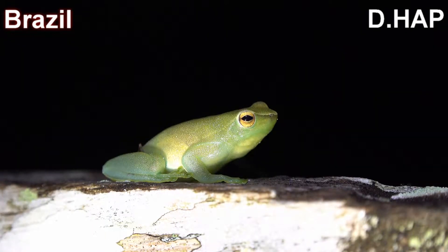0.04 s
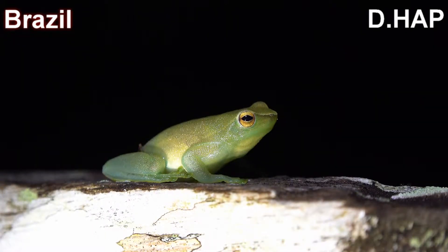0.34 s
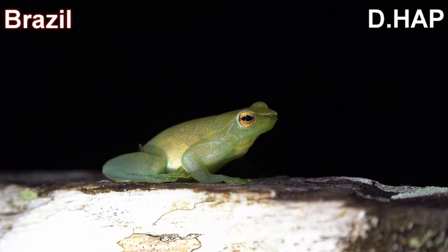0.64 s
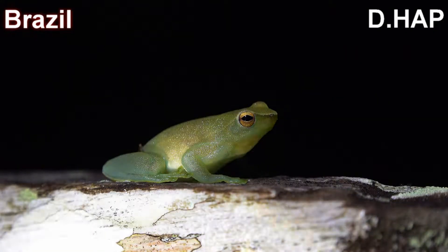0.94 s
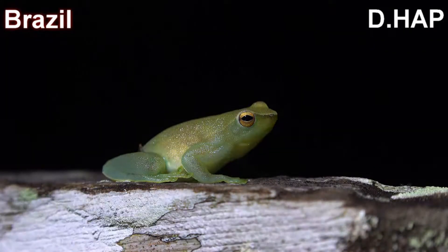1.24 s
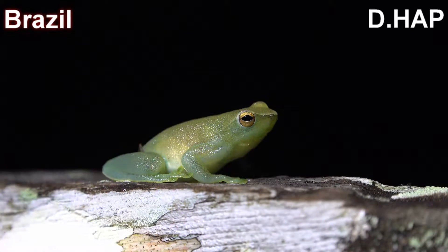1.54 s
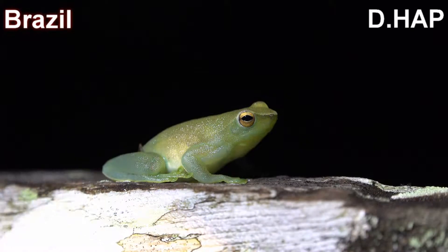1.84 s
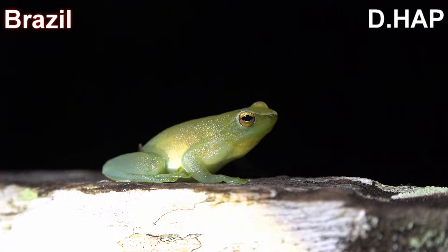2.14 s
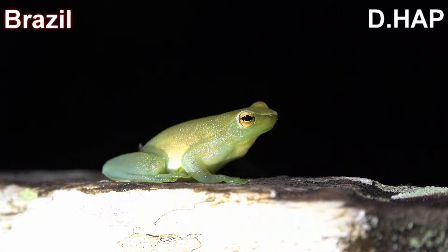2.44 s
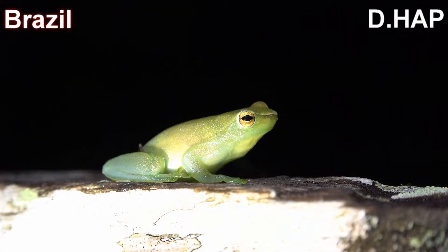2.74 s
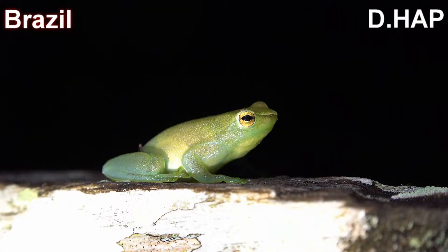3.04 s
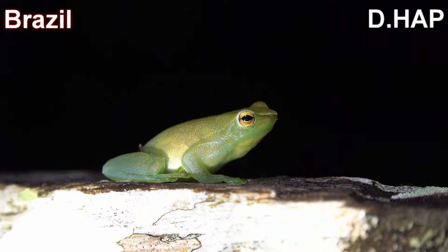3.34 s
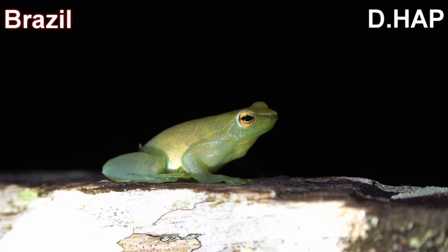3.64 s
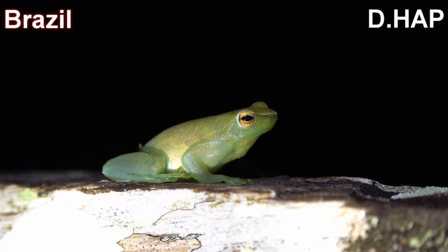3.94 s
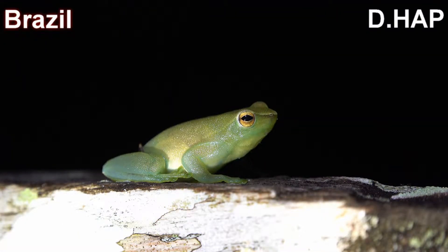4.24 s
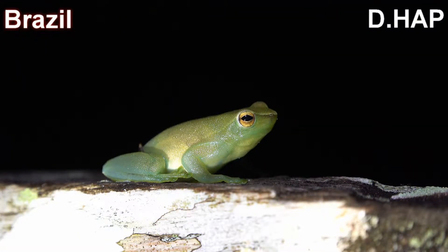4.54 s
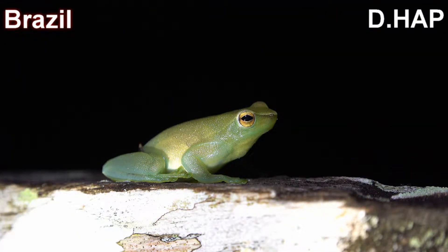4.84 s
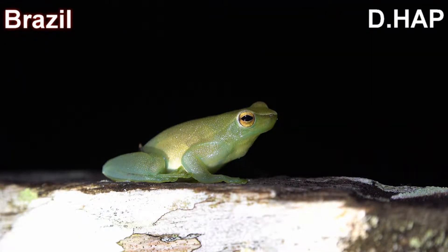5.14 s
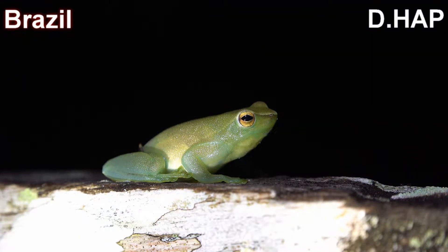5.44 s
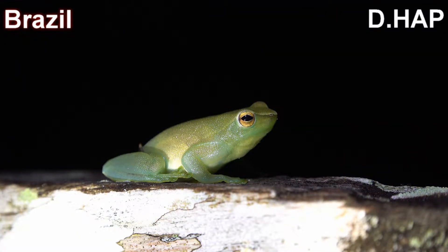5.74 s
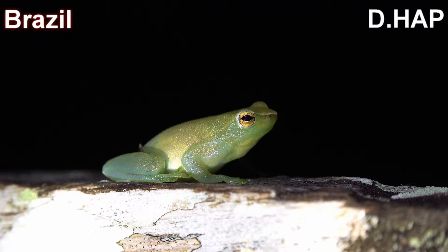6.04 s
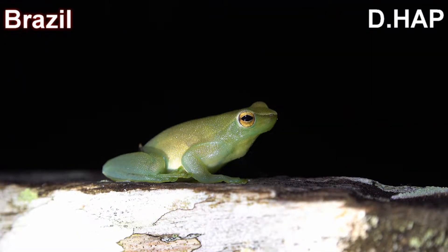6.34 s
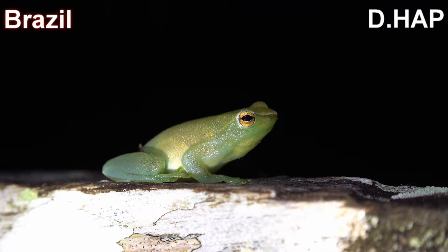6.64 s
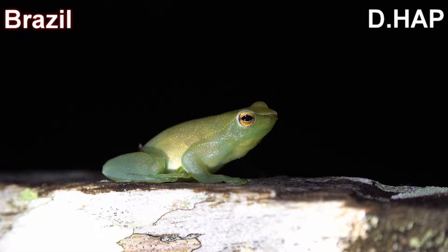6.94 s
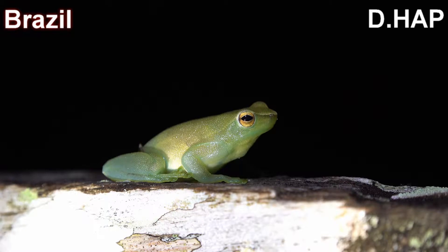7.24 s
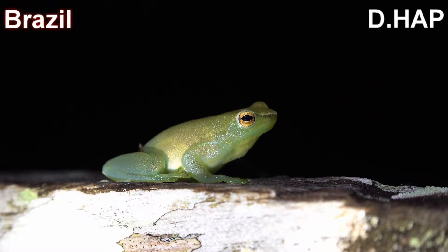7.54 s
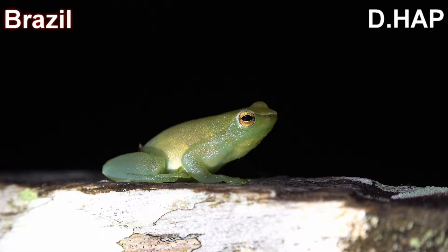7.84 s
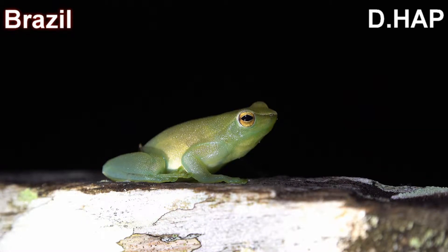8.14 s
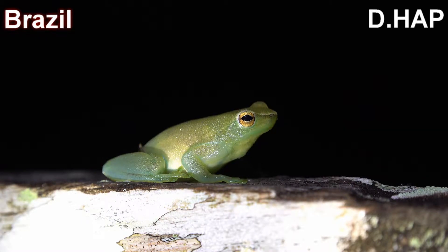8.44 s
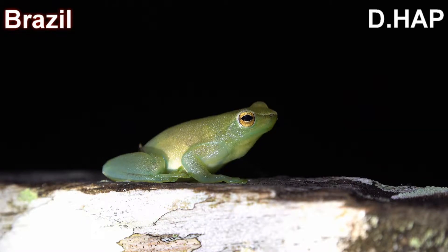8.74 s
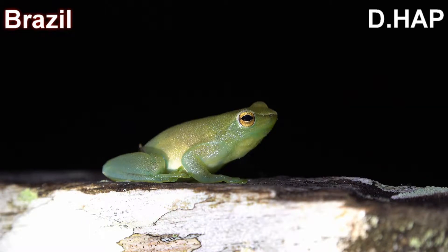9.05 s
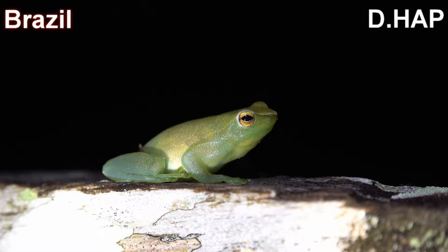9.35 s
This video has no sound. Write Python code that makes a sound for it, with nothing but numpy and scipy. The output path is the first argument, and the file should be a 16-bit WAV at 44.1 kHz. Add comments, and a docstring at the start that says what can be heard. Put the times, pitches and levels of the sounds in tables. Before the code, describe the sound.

A steady bed of crickets and bursts of high katydid rasping surround the microphone in a night forest. Just right of centre, a close tree frog repeats a quick upward whistle roughly every second. Other frogs answer with soft squeaks and distant whistles through the first half, and a high trill stops after two seconds. A far, lower trill comes and goes throughout, with a faint low hum underneath.

```python
"""A forest at night, in stereo, over a bed of crickets and a faint low hum. From the start katydids
rasp their wings in bouts, a far frog pulses a low trill and a high trill runs for two seconds.
From 0.7 s a tree frog, close and a little right of the microphone, sweeps a rising whistle through its
vocal sac about once a second, and trunks throw it back. Softer squeaks and farther whistles answer
until just past five seconds; then a faint far tone swells under the near frog and the insects."""
import sys
import numpy as np
from scipy import signal
from scipy.fft import rfft, irfft
from scipy.io import wavfile
from scipy.ndimage import uniform_filter1d

SR = 44100
rng = np.random.default_rng(int(sys.argv[2]) if len(sys.argv) > 2 else 0)


def wav_record(signal):
    """Record a signal, one row per channel, as 16-bit PCM in the file named by sys.argv[1]."""
    frames = np.transpose(np.atleast_2d(signal))
    bounded = np.clip(frames, -1, 1)
    # unit amplitude maps onto the largest positive 16-bit level
    quanta = np.round(bounded * 32767).astype(np.int16)
    wavfile.write(sys.argv[1], SR, quanta)


N = 414540
TIME = np.arange(N) / SR
FREQ = np.fft.rfftfreq(N, 1 / SR) + 1e-6


def near_frog(base_db=-38, fade_db=-22.5, attack_s=.024, release_s=.012, flutter_hz=145, flutter=.59):
    """Close, right: one sweep rings the vocal sac at each call; it flutters low down and ends smooth."""
    # the calls (time [s], relative level [dB], push on the high ending [dB])
    calls = [(.6704, 0, 5), (1.7132, .3, 4), (2.669, 0, 2), (3.7956, -.5, 9), (4.6527, 0, 7),
             (6.3747, -.4, 10), (7.2767, .5, 2.5), (8.2359, 0, 9.5), (9.3049, -.4, 8.5)]
    # the sweep they share (time from the call's loudest moment [s], pitch [Hz])
    sweep = [(-.06, 942), (-.05, 993), (-.04, 1424), (-.008, 1803), (.008, 2159), (0.024, 2515),
             (0.043, 2650), (.076, 3016), (.105, 2870)]
    # vocal sac resonances (centre [Hz], half width [Hz], boost [dB])
    sac = [(1932, 180, 19.5), (2528, 36, 7)]
    # echoes from near trunks (delay [s], pressure [share of the direct sound])
    trunks = [(.00967, 0.093), (0.0117, 0.46), (0.0231, .12), (.03914, 0.094)]
    knots, pitch = np.transpose(sweep)
    s = np.linspace(knots[0], knots[-1], 200)
    hz = np.interp(s, knots, pitch)
    fade = np.clip(1 - (s - s[0]) / attack_s, 0, 1) + np.clip(1 - (s[-1] - s) / release_s, 0, 1)
    sac_db = sum(boost / (1 + ((hz - centre) / width) ** 2) for centre, width, boost in sac)
    db = base_db + fade_db * fade + sac_db
    ending = np.exp(-((s - .08) / .017) ** 2)
    voice = 0
    for at, call_db, push_db in calls:
        depth = np.interp(TIME - at, [0, .012], [flutter, 0])
        tone = glide(at + s, hz * (1 + .0027 * rng.standard_normal()), db + call_db + push_db * ending)
        voice = voice + tone * (1 + depth * np.cos(2 * np.pi * flutter_hz * (TIME - at)))
    voice = voice + sum(share * delayed(voice, delay) for delay, share in trunks)
    voice = voice * undb(walk(120))  # the call swells in small lumps
    # leaves scatter the short waves of the ending more than the low start
    scatter = forest(voice, wet_db=-11, t60=.39, side=.45) - voice
    scatter = irfft(rfft(scatter) * colour([(1200, -2), (2000, -3.5), (2800, 4.5)]), N)
    return pan(voice + scatter, left_db=-3)


def squeak(start, length, top_hz, rise_db, fall_db, foot_hz=1000, attack_s=.018, release_s=.0079):
    """Tension builds slowly and lets go quickly; the pitch follows, and the tone thins as it climbs."""
    u = np.linspace(0, 1, 100)
    crest = .68  # share of the length
    rising = np.minimum(u / crest, 1)
    falling = np.clip((u - crest) / (1 - crest), 0, 1)
    tension = np.sin(np.pi / 2 * rising) ** 2.6 * np.cos(np.pi / 2 * falling) ** 1.26
    hz = foot_hz * (top_hz / foot_hz) ** tension
    edges = np.clip(1 - u * length / attack_s, 0, 1) + np.clip(1 - (1 - u) * length / release_s, 0, 1)
    effort_db = rise_db + (fall_db - rise_db) * np.minimum(2 * falling, 1)
    thinning_db = -23 * np.maximum(np.log2(hz / 1300), 0)  # per octave above 1300 Hz
    return glide(start + length * u, hz, effort_db + thinning_db - 17 * edges)


def far_whistle(start, length, first_hz, top_hz, bend, db, attack=.38, release=.11):
    """A rise that levels off; attack and release are shares of its length."""
    u = np.linspace(0, 1, 100)
    hz = top_hz - (top_hz - first_hz) * (1 - u) ** bend
    envelope_db = -20 * np.clip(1 - u / attack, 0, 1) - 10 * np.clip(1 - (1 - u) / release, 0, 1)
    return glide(start + length * u, hz, db + envelope_db)


def answering_frogs():
    """Right: soft, unsteady squeaks and, farther off, whistles that linger in the undergrowth."""
    # arched squeaks (start [s], length [s], top [Hz], relative level of rise [dB] and of fall [dB])
    arches = [(0.329, .058, 1450, -46.5, -35.5), (0.595, 0.076, 2400, -47, -30.5),
              (0.919, 0.082, 2600, -59, -27.5), (1.051, .086, 2074, -36.5, -41),
              (1.331, .099, 2700, -44.5, -32.5), (1.978, .064, 1720, -36, -36.5),
              (3.441, 0.064, 1800, -35, -34.5), (4.189, 0.083, 1955, -38, -42)]
    # rising whistles (start [s], length [s], first [Hz], top [Hz], bend [1 = none], relative level [dB])
    rises = [(.262, 0.13, 1377, 2610, 2.3, -40.5), (0.386, 0.078, 1350, 2290, 2.4, -42.5),
             (3.273, 0.076, 1960, 2560, 2.4, -40), (5.3, 0.092, 899.4, 2400, 1.23, -34)]
    squeaks = sum(squeak(*row) for row in arches) * undb(-1.5 + 2 * walk(300))
    squeaks = squeaks + .31 * delayed(squeaks, .012)  # bounce from near trunks
    whistles = sum(far_whistle(*row) for row in rises) * undb(-1.5 + 3.9 * walk(250))
    nearer = pan(forest(squeaks, wet_db=-12, t60=.14), left_db=-3)
    farther = pan(forest(whistles, wet_db=-5, t60=.23), left_db=-2.5)
    return nearer + farther


def low_trill(rate_hz=140, rest_db=-63):
    """Far off among the trees, quick uneven pulses ring a vocal sac; the pulsing goes on faintly in the rests."""
    # the frog's trills (start [s], end [s], relative level [dB])
    trills = [(-.1, 0.42, -48), (0.875, 2.298, -48.5), (2.37, 2.398, -44), (2.738, 4.297, -49.5),
              (4.957, 6.51, -49.5), (7.01, 8.45, -49), (8.973, 9.5, -49.5)]
    cycles = np.cumsum(rate_hz * (1 + .036 * walk(110))) / SR
    pulses = np.diff(np.floor(cycles), prepend=0)
    sac = unit(irfft(rfft(pulses) * resonance(1841, 115) * resonance(1750, 880), N))
    effort = undb(rest_db)
    for start, end, db in trills:
        effort = effort + undb(db) * np.clip(np.minimum(TIME - start, end - TIME) / .017, 0, 1)
    voice = sac * effort * undb(-3.5 + walk(12))
    return pan(forest(voice, wet_db=-3, t60=.25), left_db=-2.5)


def high_trill(centre_hz=3860, width_hz=200, second_stroke=.55, swap_s=.6, end_s=2.085, release_s=.12):
    """Right: a frog's paired strokes stress every other partial; the stress swaps as the trill slows."""
    # the frog's effort (time [s], relative level [dB])
    effort = [(0.0, -39), (0.262, -44.5), (0.416, -38.5), (1.058, -45), (1.322, -38.5), (1.728, -39),
              (1.97, -43.5)]
    rate_hz = 111.25 - 1.53 * TIME
    phase = 2 * np.pi * np.cumsum(rate_hz) / SR + .011 * walk(150)
    tone = 0
    for k in range(31, 40):
        pairing = 1 + (-1) ** k * np.sign(TIME - swap_s) * second_stroke
        band = 1 / (1 + ((k * rate_hz - centre_hz) / width_hz) ** 4)
        tone = tone + pairing * band * undb(walk(14.2)) * np.cos(k * phase)
    fade = np.clip((end_s - TIME) / release_s, 0, 1)
    tone = tone / np.std(tone[TIME < end_s]) * undb(curve(effort) - 1) * fade
    return pan(forest(tone, wet_db=-11, t60=.35), left_db=-4.5)


def katydid(bouts, wing, rate_hz, wave_db, chirp_s, tail_s, wash, side_db):
    """Each wing stroke is a rasp that swells and stops short; scatter in the foliage fills the gaps."""
    strokes = np.zeros(N)
    for first, last, db in bouts:
        times = np.linspace(first, last, round((last - first) * rate_hz) + 1)
        gains = undb(db + .66 * rng.standard_normal(len(times)))
        strokes[(times * SR).astype(int)] = gains ** 2 * SR / rate_hz
    u = np.arange(-SR // 20, SR // 20) / SR / chirp_s - .6
    shape = np.exp(-.5 * (u / np.where(u < 0, 1.25, .5)) ** 2)
    direct = signal.fftconvolve(strokes, shape / shape.sum(), "same")
    decay = np.exp(-1 / (tail_s * SR))
    scatter = signal.lfilter([1 - decay], [1, -decay], direct)
    power = np.abs(direct + wash * scatter) / (1 + wash)
    teeth = undb(.62 * walk(500))  # the teeth of the wing's file catch unevenly
    rasp = unit(noise(colour(wing) * wing_ripple(), undb(side_db)))
    return rasp * np.sqrt(power) * teeth * undb(wave_db * chorus_wave())


def wing_ripple():
    """Many small wing resonances, each about 100 Hz wide, roughen the colour."""
    hz = np.arange(0, SR / 2, 90)
    return undb(2.2 * np.interp(FREQ, hz, rng.standard_normal(len(hz))))


def katydids():
    """Three wing rasps spread around the microphone: one dark, one bright, one thin and high."""
    # bouts of chirps (first chirp [s], last chirp [s], relative level [dB])
    dark_bouts = [(.03, .207, -42.5), (.303, .545, -44), (1.416, 2.19, -42), (3.337, 4.24, -43),
                  (5.25, 6.144, -46.5), (7.19, 8.255, -47)]
    bright_bouts = [(.425, 1.335, -43.5), (2.28, 3.242, -43.5), (3.75, 4.2, -42.5), (4.296, 5.31, -43.5),
                    (5.5, 6.14, -46), (6.22, 7.12, -44.5), (7.22, 8.255, -45), (8.322, 8.917, -38.5)]
    thin_bouts = [(2.79, 3.3, -51), (4.62, 5.31, -57), (5.37, 6.14, -51), (6.22, 7.12, -52),
                  (7.18, 8.917, -52)]
    # wing colours (frequency [Hz], gain [dB])
    dark_wing = [(5500, -25.5), (7300, -7.5), (8100, -6), (8900, 2), (9700, -9), (10800, -15), (13000, -19),
                 (15500, -21.5)]
    bright_wing = [(5000, -20.5), (6600, -3), (7800, 2.5), (9200, 2.5), (10500, -4.5), (11900, -8.5),
                   (13300, -7.5), (15500, -17.5)]
    thin_wing = [(9000, -23.5), (9550, 2.5), (9900, -25), (10300, -17), (10550, 10), (10800, -26),
                 (11500, -36)]
    dark = katydid(dark_bouts, dark_wing, rate_hz=16.75, wave_db=1.2,
                   chirp_s=.0095, tail_s=.24, wash=.22, side_db=-6)
    bright = katydid(bright_bouts, bright_wing, rate_hz=15.5, wave_db=2.6,
                     chirp_s=.0105, tail_s=.064, wash=.25, side_db=-5)
    thin = katydid(thin_bouts, thin_wing, rate_hz=15.5, wave_db=-1.5,
                   chirp_s=.0069, tail_s=.04, wash=.22, side_db=-1)
    return pan(dark + bright, left_db=-.5) + thin


def crickets():
    """Swarms of many singers blur into narrow bands that throb at the stroke rate and ride slow waves."""
    # swarms (centre [Hz], width [Hz], wing strokes [1/s], throb [share], level [dB], wave swing [dB])
    swarms = [(3191, 195, 31, 0.069, -54, 0), (3745, 240, 55, 0.15, -57, .5),
              (4703, 80, 59, 0.43, -63, 2.5), (5679, 234, 46, 0.1, -44.5, 2),
              (6840, 840, 94, 0.23, -44, -0.1)]
    # the highest swarm's drift, taken about its mean (time [s], level [dB])
    high_swarm = [(0.0, -42.5), (0.34, -45), (1.33, -43), (1.96, -47), (8.59, -44), (9.4, -44)]
    high_db = curve(high_swarm)
    drifts = [0] * (len(swarms) - 1) + [high_db - np.mean(high_db)]
    out = 0
    for (hz, width_hz, rate, depth, db, wave_db), drift_db in zip(swarms, drifts):
        throb = 1 + depth * np.sin(2 * np.pi * np.cumsum(rate * (1 + .0322 * walk(6.8))) / SR)
        band = unit(noise(resonance(hz, width_hz), undb(-10)))
        out = out + band * throb * undb(db + wave_db * chorus_wave() + drift_db + .3 * walk(11))
    return pan(out, left_db=-.4)


def chorus_wave(period_s=1.77, crest_s=.69):
    """The slow rise and fall of the whole insect chorus, -1 to 1."""
    return np.cos(2 * np.pi * (TIME - crest_s) / period_s)


def night_air():
    """All around: the wash of distant insects and still air, with soft, dull swells far off."""
    # far chorus and air (frequency [Hz], density [dB per Hz])
    air = [(20, -100), (45, -93.5), (100, -91), (180, -96.5), (270, -94.5), (600, -102), (1300, -100),
           (2400, -99), (3000, -85), (4400, -90.5), (7000, -86.5), (9500, -87), (12000, -90.5),
           (15500, -98.5)]
    # its stereo spread (frequency [Hz], side minus mid [dB])
    spread = [(40, -18), (110, -7), (200, -2.5), (380, 5.5), (700, 10), (1300, 7.5), (3000, -11), (8000, 2),
              (15000, -2)]
    # dull swells of noise (middle [s], length [s], centre [Hz], level [dB])
    low_swells = [(.15, 0.48, 300, -60.5), (0.658, 0.48, 756, -59), (2.247, .5, 310, -64.5),
                  (2.848, 0.35, 310, -66.5), (5.4, 0.43, 290, -66.5), (6.017, 0.16, 250, -62),
                  (8.35, 0.69, 290, -63)]
    wash = noise(colour(air), colour(spread)) * np.sqrt(SR / 2) * undb(.076 * walk(3))
    for at, length, hz, db in low_swells:
        wash = wash + unit(noise(resonance(hz, .56 * hz), undb(-7.5))) * swell(at, length, db)
    return wash


def low_hum(hz=59.2, db=-72, overtone_hz=120.3, overtone_db=-73.5):
    """Centre: a faint hum and one overtone, both wavering in level and phase."""
    # brief swells of the hum (middle [s], length [s], level [dB])
    hum_swells = [(.15, 0.29, -71), (6.25, 0.44, -70), (6.88, .2, -62)]
    gain = undb(db + 2.5 * walk(5)) + sum(swell(*row) for row in hum_swells)
    hum = gain * np.sin(2 * np.pi * hz * TIME + .5 * walk(3.5))
    overtone = undb(overtone_db + walk(5.4)) * np.sin(2 * np.pi * overtone_hz * TIME + .77 * walk(15))
    return np.sqrt(2) * (hum + overtone)


def far_tone(centre_hz=795):
    """Far off: a faint, unsteady tone that swells once, near the end."""
    hz = centre_hz * (1 + .011 * walk(2.4) + .0071 * walk(40))
    tone = np.sin(2 * np.pi * np.cumsum(hz) / SR)
    return tone * swell(at=8, length=5, db=-70.5) * undb(2.1 * walk(13))


def forest(x, wet_db, t60, side=.66):
    """Add diffuse scatter from leaves and far trunks; it builds up, then dies away."""
    t = TIME[:SR * 3 // 4]
    build_up = np.clip((t - .012) / .016, 0, 1)
    tail = rng.standard_normal((2, len(t))) * undb(-60 * t / t60) * build_up
    mid, wide = tail / np.sqrt(np.sum(tail ** 2, axis=1, keepdims=True))
    response = np.array([mid + side * wide, mid - side * wide])
    return x + undb(wet_db) * signal.fftconvolve(x[None], response, axes=1)[:, :N]


def glide(s, hz, db):
    """A pure tone that follows a pitch and level contour."""
    out = np.zeros(N)
    span = (TIME >= s[0]) & (TIME <= s[-1])
    t = TIME[span]
    edges = np.clip(np.minimum(t - s[0], s[-1] - t) / .00093, 0, 1)
    phase = 2 * np.pi * np.cumsum(np.interp(t, s, hz)) / SR
    out[span] = edges * undb(np.interp(t, s, db)) * np.sin(phase)
    return out


def noise(gain, side):
    """Stereo noise of a given colour and side share."""
    mid, wide = rfft(rng.standard_normal((2, N))) * gain
    return irfft(np.array([mid + side * wide, mid - side * wide]), N)


def colour(points):
    """Gain at each frequency from (frequency [Hz], gain [dB]) points."""
    hz, db = np.transpose(points)
    return undb(np.interp(np.log(FREQ), np.log(hz), db))


def resonance(hz, width_hz):
    """A resonance applied twice, for steep skirts."""
    return (1 + 1j * (FREQ ** 2 - hz ** 2) / (FREQ * width_hz * np.pi / 2)) ** -2


def swell(at, length, db):
    """Gain of one rounded swell, centred on a time."""
    return undb(db) * np.cos(np.pi * np.clip((TIME - at) / length, -.5, .5))


def curve(points):
    """Join (time [s], value) points by straight lines."""
    return np.interp(TIME, *np.transpose(points))


def walk(rate_hz):
    """Smooth random drift with rms 1."""
    k = int(SR / rate_hz)
    return unit(uniform_filter1d(np.repeat(rng.standard_normal(N // k + 1), k), k)[:N])


def delayed(x, delay_s):
    """The same sound, arriving later."""
    return np.interp(TIME - delay_s, TIME, x, left=0)


def pan(x, left_db):
    """Lean a sound to the left (+) or right (-)."""
    return x * undb(np.array([[left_db], [-left_db]]) / 2)


def undb(db):
    """Decibels to gain."""
    return 10 ** (np.asarray(db) / 20)


def unit(x):
    """Scale to rms 1."""
    return x / np.sqrt(np.mean(x ** 2))


def scene():
    """Frogs in front and to the right of the microphone, insects all around."""
    rasps = katydids()
    frogs = near_frog() + answering_frogs() + low_trill() + high_trill()
    return frogs + rasps + crickets() + night_air() + low_hum() + far_tone()


def record(dry, top_hz=15500):
    """The recorder cuts the top."""
    return signal.sosfilt(signal.ellip(10, .2, 80, top_hz, fs=SR, output="sos"), dry)


dry = scene()
out = record(dry)
wav_record(out)
```